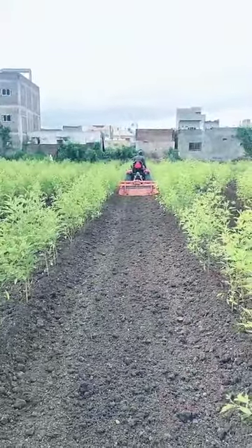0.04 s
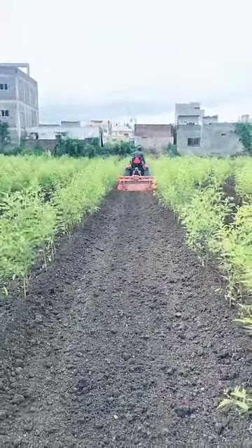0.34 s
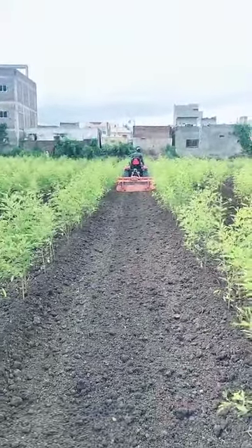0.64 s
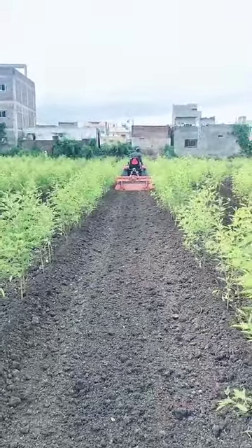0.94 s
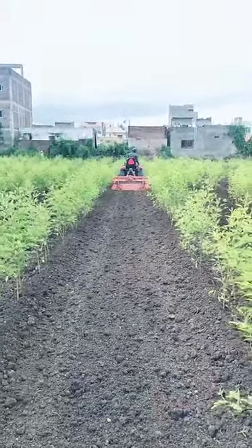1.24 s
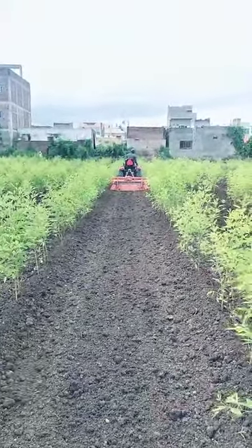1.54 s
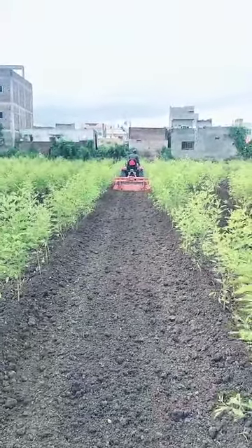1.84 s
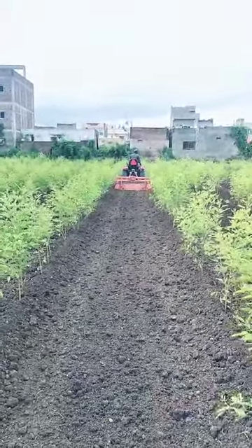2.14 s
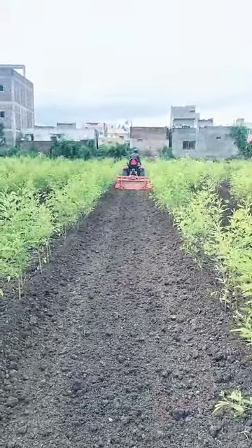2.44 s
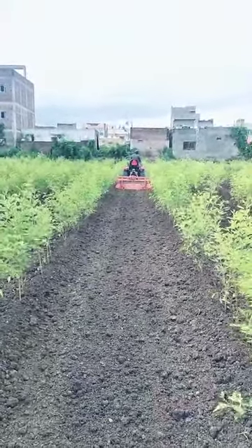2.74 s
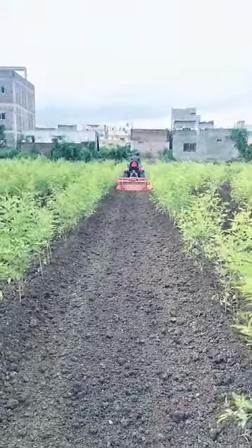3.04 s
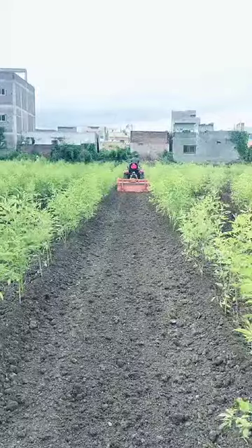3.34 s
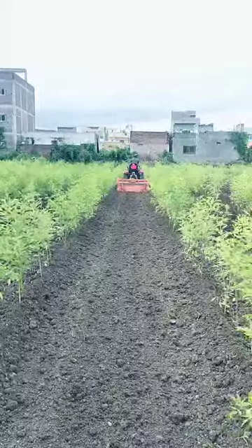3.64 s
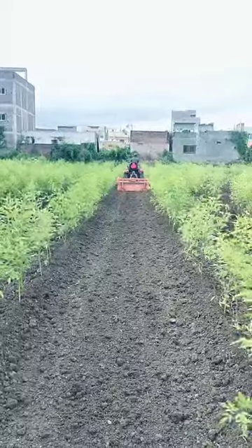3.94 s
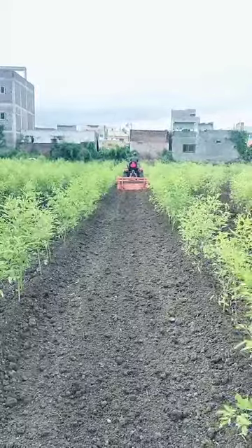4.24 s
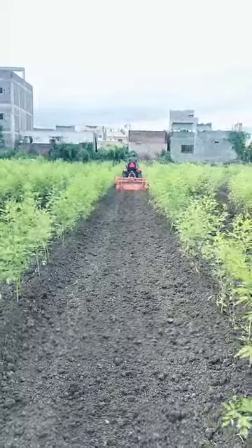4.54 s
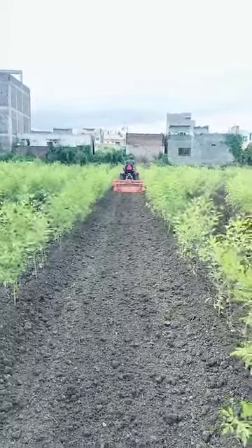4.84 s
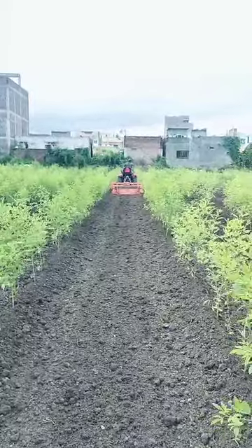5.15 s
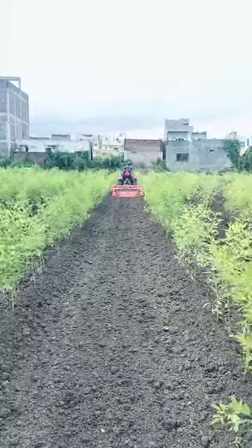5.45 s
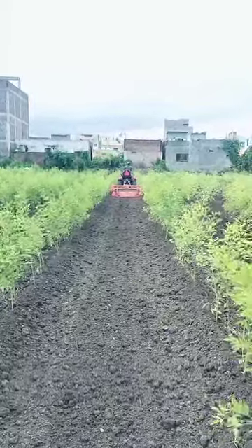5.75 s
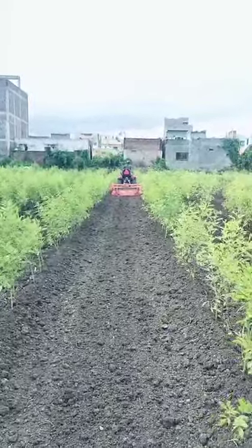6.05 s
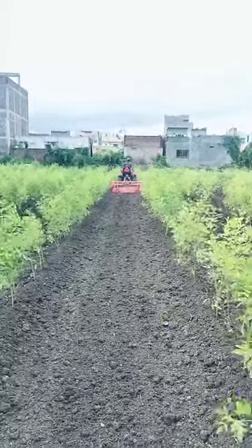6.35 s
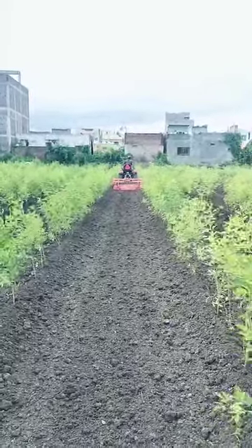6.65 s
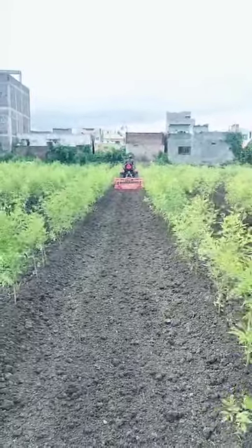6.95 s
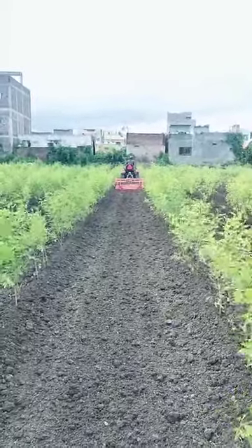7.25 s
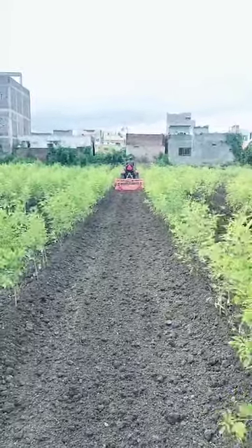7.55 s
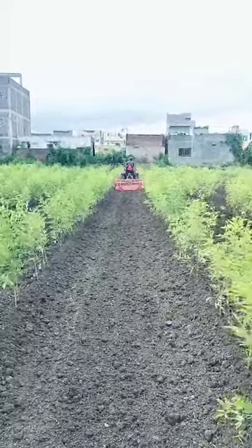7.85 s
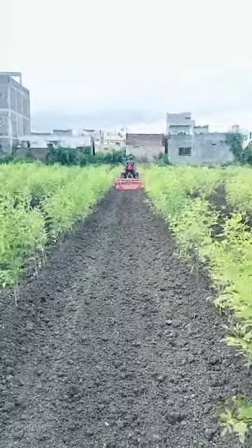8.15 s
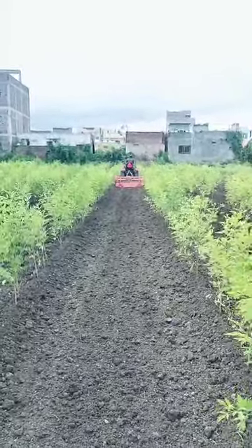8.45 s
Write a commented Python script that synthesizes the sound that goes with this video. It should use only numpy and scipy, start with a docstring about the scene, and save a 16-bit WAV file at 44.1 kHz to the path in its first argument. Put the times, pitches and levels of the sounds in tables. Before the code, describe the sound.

A small diesel tractor is running from the start in an open field, with a steady low throb, a knocking rattle and a wavering gear whine. Its rotary tiller adds a continuous gritty hiss of sprayed soil and faint, high metallic squeals. A loose flap clanks irregularly, most busily in the first two seconds, and stones flick against the hood at about 1.1, 1.5 and 4.3 seconds. The machine slowly gets fainter as it moves away. From around 3.6 seconds wind hits the microphone, with low thumps near 4, 4.6 and 6 seconds and a gusty rumble that continues to the end. The engine sags slightly near 7 seconds, and its throb dips in and out until about 8 seconds, then returns under the wind until roughly 8.6 seconds.

```python
"""First comes the throb of a small diesel tractor, dragging a rotary tiller slowly away over a field.
Exhaust puffs ring the silencer, knocks and taps rattle the block, and gear teeth whine.
The tines spray soil and flick stones at the hood, rub with a faint squeal and keep a flap clanking.
Halfway through, wind starts to buffet the two microphone ports and the throb comes and goes."""
import sys
import numpy as np
from scipy import signal
from scipy.fft import rfft, irfft
from scipy.io import wavfile
from scipy.ndimage import uniform_filter1d

SR = 44100
rng = np.random.default_rng(int(sys.argv[2]) if len(sys.argv) > 2 else 0)


def put_to_file(sound):
    """Save the sound as 16-bit audio at rate SR, in the file named by the first command-line argument."""
    columns = np.atleast_2d(sound).T  # one column per channel
    safe = np.clip(columns, -1, 1)
    whole_steps = np.round(safe * 32767)
    wavfile.write(sys.argv[1], SR, whole_steps.astype(np.int16))


N = 378819
TIME, BINS = np.arange(N) / SR, np.fft.rfftfreq(N, 1 / SR)
CRUISE_SPEED = 34.5  # crankshaft turns a second


def from_db(db):
    """Decibels to gain."""
    return 10 ** (np.asarray(db) / 20)


def unit(x):
    """Scales to an rms of one."""
    return x / np.sqrt(np.mean(x ** 2) + 1e-20)


def stereo(left, right):
    """A value for each channel, as a column."""
    return np.array([[left], [right]])


def over_time(rows):
    """Each column of an automation table, at every sample."""
    times, *columns = np.transpose(rows)
    return np.array([np.interp(TIME, times, c) for c in columns])


def over_hz(rows):
    """Each column of a spectrum table, at every frequency bin."""
    hz, *columns = np.transpose(rows)
    return np.array([np.interp(np.log(BINS + 1), np.log(hz + 1), c) for c in columns])


def colour(x, gain):
    """Filters by a gain for each bin."""
    return irfft(rfft(x) * gain, N)


def ring(hz, width_hz):
    """Gain of a resonance."""
    return 1 / (1 + ((BINS - hz) / (width_hz / np.sqrt(2))) ** 2)


def below(hz, order):
    """Gain of a low-pass."""
    return 1 / (1 + (BINS / hz) ** order)


def noise():
    """Two unrelated channels of white noise."""
    return rng.standard_normal((2, N))


def drift(rate_hz):
    """Smooth random modulation with an rms of one."""
    return unit(colour(rng.standard_normal(N), below(rate_hz, 4)))


def swell(at, length):
    """A smooth rise and fall around one moment."""
    return np.exp(-((TIME - at) / length) ** 2)


def swells_db(rest_db, rows):
    """A resting level with swells on top, in dB; one curve for each level column of the rows."""
    power = sum(from_db(dbs)[:, None] ** 2 * swell(at, length) for at, length, *dbs in rows)
    return 10 * np.log10(from_db(rest_db) ** 2 + power)


def pulses(turns):
    """One click each time the count of turns passes a whole number."""
    return np.diff(np.floor(turns), prepend=np.floor(turns[0]))


def receding_db(fade, speed):
    """Level of a part of the machine: fainter with time, louder with engine speed."""
    start_db, loss_db_per_s, speed_db = fade
    return start_db - loss_db_per_s * TIME + speed_db * (speed - CRUISE_SPEED)


# likeness of the two ports: f/Hz, coherence/0-1
PORT_LIKENESS = [(300, 0.66), (700, 1), (1200, 0.9), (1900, 0.66), (3000, 0.53), (5000, 0.42), (8000, 0.38),
                 (13000, 0.1)]
# lead of the left port: f/Hz, phase/rad
LEFT_LEAD = [(150, 0), (430, .3), (690, -.3), (950, 1.1), (1210, -.2), (1550, .7), (1810, .5), (3100, 1.8),
             (3960, 1.4), (5340, 2.2), (8700, 2.7), (10900, 4), (15200, 6.8)]


def ports(pair):
    """Two unrelated signals become one wide, partly shared sound, mostly leading on the left."""
    same = np.clip(over_hz(PORT_LIKENESS)[0], 0, 1)
    left, other = rfft(pair)
    right = (same * left + np.sqrt(1 - same ** 2) * other) * np.exp(-1j * over_hz(LEFT_LEAD)[0])
    return irfft(np.array([left, right]), N)


# tone of the silencer and its pipe: f/Hz, level/dB
SILENCER_EQ = [(12, -53), (34, -7.5), (69, -2.5), (103, 4), (138, -5.5), (172, -13.5), (206, -19),
               (241, -32.5), (276, -40.5), (330, -35), (450, -34.5), (900, -93)]
# tone of the rushing gas: f/Hz, level/dB
GAS_EQ = [(30, -18), (80, -1.5), (150, 4), (190, -9), (260, -15), (350, -23), (800, -69)]
# single partials bloom or hollow out as the tractor moves: t/s, length/s, f/cruise speed, gain/dB
PARTIAL_SWELLS = [(1.3, 0.61, 2, -1.5), (1.35, 0.45, 3, -1.5), (1.43, 0.59, 4, 4), (2.64, 0.73, 2, -4),
                  (3.3, 0.57, 4, 4), (7.6, 0.5, 4, 6), (7.24, 0.39, 2, 6), (7.5, 0.38, 5, 4.5)]
# fade of the throb: start level/dB, loss/(dB/s), lift/(dB per extra turn a second)
THROB_FADE = (-20, 0.46, 2.14)
# the throb swells or ducks in the wind: t/s, length/s, left gain/dB, right gain/dB
THROB_SWINGS = [(3.7, 0.41, -1.5, -1.5), (4.118, 0.068, 0, -10.5), (4.42, 0.26, 2.5, 4),
                (4.784, 0.087, -5.5, -7), (5.093, 0.14, 2.5, 2.5), (5.8, .3, 1.7, 0),
                (6.154, .06, -1.5, -1.5), (6.567, 0.062, -4, 5), (6.88, 0.18, -5.5, -8),
                (7.178, 0.053, -11, -9), (7.394, 0.1, -10, -5), (7.668, 0.18, -11, -2.5),
                (7.913, .04, -15, -9), (8.3, 0.095, -1, -1.5)]


def exhaust(turns, speed, limp=0.094, uneven=0.0073, rush_db=-17, flutter_db=2.5):
    """One puff a turn, alternately strong and weak, rings the silencer; gas rushes out behind it."""
    puffs = pulses(turns) * (1 + limp * np.cos(np.pi * turns) + uneven * rng.standard_normal(N))
    cepstrum = irfft(np.log(from_db(over_hz(SILENCER_EQ)[0])), N)
    silencer = np.exp(rfft(cepstrum * (1 + np.sign(np.fft.fftfreq(N)))))  # rings only after the puff
    rush = unit(colour(rng.standard_normal(N), from_db(over_hz(GAS_EQ)[0])))
    throb = unit(colour(puffs, silencer)) + from_db(rush_db) * rush
    throb += sum((from_db(db) - 1) * swell(at, length) * colour(throb, ring(k * CRUISE_SPEED, 16))
                 for at, length, k, db in PARTIAL_SWELLS)
    swings_db = sum(stereo(left, right) * swell(at, length) for at, length, left, right in THROB_SWINGS)
    level_db = receding_db(THROB_FADE, speed) + swings_db + stereo(0, 0.9)
    faded = np.clip((level_db.max() - level_db.mean(0)) / 10, 0, 1) ** 2  # more flutter when faint
    return from_db(level_db + flutter_db * faded * drift(13)) * throb


# the four piston knocks of one engine cycle: relative strength
KNOCK_ACCENTS = [.9, .2, .3, 1.1]
# ring of the block and sheet metal: f/Hz, left level/dB, right level/dB
BLOCK_EQ = [(147, 1, 7.5), (292, -10, -8.5), (531, -4, -7), (694, 3, 5), (765, -4, -0.5), (897, -10, 3),
            (1050, 2, -16.5), (1167, -2.5, -4.5), (1375, -13, -3), (1420, -3.5, -0.5), (1780, -3.5, -6),
            (1850, -27, -16), (2205, -10, -8.5), (5070, -45.5, -41)]
# fades of block and panels: start level/dB, loss/(dB/s), lift/(dB per extra turn a second)
DRONE_FADE = (-36.5, 0.3, 1.44)
RATTLE_FADE = (-39, 0.19, .1)


def clatter(turns, speed, tap_share=0.14, knock_turns=0.063, tap_count=26):
    """Valves and injectors tap at set angles of the two-turn cycle; pistons knock every half turn."""
    angles, sizes = rng.random((tap_count, 2)).T
    taps = sum(size * pulses(turns / 2 + angle) for angle, size in zip(angles, sizes))
    half_turn, since = np.divmod(turns + .16, .5)
    accent = np.take(KNOCK_ACCENTS, half_turn.astype(int), mode="wrap")
    knocks = noise() * (1 + accent * np.exp(-since / knock_turns))
    blows = np.sqrt(tap_share) * unit(taps - taps.mean()) + np.sqrt(1 - tap_share) * unit(knocks)
    body = colour(ports(blows), from_db(over_hz(BLOCK_EQ)))
    drone = colour(body, below(960, 16))  # the heavy block rings low, the thin panels above it
    drone_db = receding_db(DRONE_FADE, speed) + 0.81 * drift(5.3)
    rattle_db = receding_db(RATTLE_FADE, speed) + 0.75 * drift(29)
    return from_db(drone_db) * unit(drone) + from_db(rattle_db) * unit(body - drone)


# pitches of the low, middle and high gear mesh: f/crankshaft speed
MESH_PITCHES = [11.5, 21, 33]
# fade of the low mesh: start level/dB, loss/(dB/s), lift/(dB per extra turn a second)
LOW_MESH_FADE = (-41, 0.59, 9.6)
# the upper meshes sing out, before panning: t/s, length/s, middle level/dB, high level/dB
MESH_SURGES = [(.8, 0.36, -47, -53.5), (1.78, 0.17, -47.5, -68), (2.798, 0.19, -44, -57),
               (4.38, 0.36, -45, -53), (4.83, 0.073, -48, -57), (5.383, .12, -45.5, -53),
               (5.87, 0.065, -43, -64), (6.398, 0.31, -63, -48), (7.047, 0.15, -63.5, -51.5),
               (7.45, 0.15, -52, -52)]
# pitches of the faint drive-train tones: f/crankshaft speed
DRIVE_PITCHES = [12, 19, 23, 25.5, 43]
# the same tones: start level/dB
DRIVE_LEVELS = [-54, -54.5, -53.5, -60, -55.5]


def gears(turns, speed, waver_db=3.0, fade_db_per_s=0.7):
    """Gear teeth sing at multiples of the shaft speed; play in the teeth makes the tones waver."""
    def tone(order, db, play_rad, rate_hz=9.3):
        """One mesh, as a rotating phasor."""
        return from_db(db) * np.exp(1j * (2 * np.pi * order * turns + play_rad * drift(rate_hz)))
    middle_db, high_db = swells_db(rest_db=[[-54], [-58]], rows=MESH_SURGES)
    low = tone(MESH_PITCHES[0], receding_db(LOW_MESH_FADE, speed) + drift(7.5), play_rad=0.05)
    middle = tone(MESH_PITCHES[1], middle_db + 2.9 * drift(3.9), play_rad=0.52)
    high = tone(MESH_PITCHES[2], high_db + 4.9 * drift(12), play_rad=.9, rate_hz=22)
    drive = sum(tone(order, db - fade_db_per_s * TIME + waver_db * drift(1.94), play_rad=1)
                for order, db in zip(DRIVE_PITCHES, DRIVE_LEVELS))
    left = low * from_db(-0.5) + middle + high * from_db(4.5) + drive
    right = low * np.exp(-.7j) * from_db(-3.5) + middle + high * from_db(-6.5) + drive
    return np.sqrt(2) * np.array([left.real, right.real])


# how hard the tines work the earth: t/s, relative level/dB
TINE_BITE = [(0, -45), (2.3, -45), (2.85, -44), (3.1, -46.5), (3.7, -46.5), (4.2, -44), (5, -45),
             (6.9, -45), (8.59, -49.5)]
# tone of earth spraying the hood: f/Hz, left level/dB, right level/dB
SPRAY_EQ = [(400, 0.5, -6.5), (2010, 5.5, 6), (3000, 3, 4.5), (3430, 0.5, 0.5), (3720, -0.5, -3),
            (4200, 1, 0), (5180, -1.5, 3), (5160, -7.5, -2), (6380, -6.5, -9), (7310, -18.5, -18),
            (8000, -27, -25), (11100, -27, -19.5), (12300, -50, -15.5), (15500, -38, -50)]
# modes of the hood: f/Hz, width/Hz, left boost/dB, right boost/dB
HOOD_MODES = [(2140, 120, -1.5, 4.5), (2360, 54, -2, 6.5), (2847, 73, -9, 6), (3660, 90, 7.5, 3.5),
              (3900, 70, 1.5, 6.5)]


def soil(turns, crumbs_per_s=2500, crumb_spread_db=2.0, crumb_mix=0.76, pulse_depth=0.025):
    """Crumbs patter on the ringing hood over a hiss of sifting earth that pulses with the drive."""
    hits = rng.random(N) < crumbs_per_s / SR
    crumbs = hits * from_db(crumb_spread_db * np.minimum(rng.exponential(1, N), 4))
    spray = noise() + crumb_mix * unit(crumbs * noise())
    spray *= 1 + pulse_depth * np.cos(4 * np.pi * (turns + 0.1))
    spray *= from_db(.5 * drift(31))
    hood_db = sum(stereo(left, right) * ring(hz, width) for hz, width, left, right in HOOD_MODES)
    patter = unit(colour(ports(spray), from_db(over_hz(SPRAY_EQ) + hood_db)))
    return from_db(over_time(TINE_BITE)[0] + 5.0) * patter


# accented clanks of the trailing flap: t/s, relative level/dB
FLAP_CLANKS = [(.04, -31.5), (.16, -30.5), (.29, -36), (0.449, -35), (.585, -34), (.82, -28.5), (.97, -34),
               (1.105, -38), (1.505, -32), (1.622, -29), (1.758, -33), (1.905, -35), (2.424, -34),
               (2.70, -46), (2.97, -38), (3.35, -32), (4.12, -38), (4.175, -35), (4.267, -46), (5.27, -44),
               (5.476, -38), (6.945, -32), (7.075, -36), (7.738, -34), (7.89, -36.5)]
# modes of the flap: f/Hz, width/Hz, level/dB
FLAP_MODES = [(1150, 330, -5), (1510, 120, 2), (1620, 44, -0.5), (2130, 200, -8), (2950, 200, -6.5)]


def flap(turns, slaps_a_turn=0.2, slap_db=-42, spread_db=4.5, attack_s=0.00076, decay_s=0.019):
    """The spinning rotor keeps the flap slapping; each slap is a short chatter that rings its modes."""
    slaps = pulses(slaps_a_turn * turns + 0.066 * drift(3)) ** 2
    slaps *= from_db(slap_db + spread_db * rng.standard_normal(N))
    for at, db in FLAP_CLANKS:
        slaps[round(at * SR)] += from_db(db)
    t = TIME[:SR // 4]
    slap_shape = np.exp(-t / decay_s) * (1 - np.exp(-t / attack_s))
    envelope = signal.oaconvolve(slaps, slap_shape)[:N]
    modes = sum(from_db(db) * ring(hz, width) for hz, width, db in FLAP_MODES)
    return from_db(-1.0) * envelope * unit(colour(ports(noise()), modes))


# high modes of the rubbing steel: f/Hz, width/Hz, left level/dB, right level/dB
STEEL_MODES = [(6030, 40, 4, 3), (8440, 25, -15.5, -15), (13474, 30, -5, 11.5), (14028, 16, -3.5, -7)]
# fits of squealing: t/s, length/s, relative level/dB
SQUEAL_CUES = [(0.46, 0.12, -67), (0.612, 0.024, -59), (0.79, .03, -59), (1.05, 0.091, -68),
               (1.35, 0.12, -70), (1.586, 0.019, -62), (1.87, 0.023, -60), (2.1, .05, -71),
               (2.43, 0.066, -63), (2.9, .03, -75), (3.5, .025, -68.5), (3.76, .05, -73), (4.22, .05, -68),
               (4.55, 0.13, -72), (4.918, 0.069, -62), (5.15, .03, -70), (6.29, .035, -66), (6.8, .03, -69),
               (7.18, .03, -73), (7.9, 0.13, -70), (8.25, 0.068, -73)]
# the lowest steel mode chirps on its own: t/s, length/s, relative level/dB
CHIRP_CUES = [(0.552, 0.14, -51), (.79, .025, -45), (1.867, 0.021, -49), (2.36, 0.11, -46),
              (6.464, .04, -49), (6.92, 0.036, -49), (7.76, 0.069, -54), (8.166, .03, -51),
              (8.266, 0.027, -51)]


def squeal(fits_db=3.5):
    """Rubbing tines set high steel modes singing in fits over a faint steady ring."""
    modes = sum(from_db(stereo(left, right)) * unit(colour(noise(), ring(hz, width)))
                for hz, width, left, right in STEEL_MODES)
    chirp = from_db(stereo(-4, 4)) * unit(colour(noise(), ring(hz=5060, width_hz=130)))
    grip_db = fits_db * drift(21) - 2.5
    squeal_db = swells_db(rest_db=-79, rows=SQUEAL_CUES) + grip_db
    chirp_db = swells_db(rest_db=-65, rows=CHIRP_CUES) + .5 * grip_db
    return ports(modes * from_db(squeal_db) + chirp * from_db(chirp_db))


# bed of breeze between gusts: t/s, level/dB
BREEZE_BED = [(0, -50), (3.2, -48), (4.0, -29), (5.7, -38.5), (6.3, -26.5), (7.5, -29), (8.0, -30.5),
              (8.59, -32)]
# gusts at the ports: t/s, length/s, left level/dB, right level/dB
GUST_CUES = [(0.496, 0.33, -34, -44), (2.15, .12, -37, -34), (3.635, .08, -50, -23), (4.59, 0.06, -33, -20),
             (4.93, 0.07, -27, -28), (5.15, 0.097, -38, -24.5), (5.353, 0.054, -28.5, -27),
             (5.893, 0.068, -30, -28), (7.015, 0.068, -22, -21.5), (7.317, .12, -28, -25),
             (7.82, 0.1, -28, -30), (8.45, 0.13, -30, -31)]
# tone of the wind rumble: f/Hz, level/dB
RUMBLE_EQ = [(8, -23), (25, 7), (60, 2.5), (110, 4), (150, 0), (200, -17.5), (300, -40.5), (600, -28),
             (2000, -80)]


def wind(lump_db=2.5):
    """Moving air gives each port its own lumpy rumble, faint at first and swelling in gusts."""
    strength_db = swells_db(over_time(BREEZE_BED), GUST_CUES) + lump_db * drift(12.5)
    return from_db(strength_db) * unit(colour(noise(), from_db(over_hz(RUMBLE_EQ))))


# stones and clods hit the hood: t/s, level/dB, f/Hz, width/Hz, length/s
STONE_HITS = [(1.129, -43, 4000, 2000, 0.016), (1.484, -38, 3950, 2400, 0.01), (2.44, -52, 6100, 89, 0.045),
              (4.12, -55, 6300, 1500, .015), (4.336, -40, 4000, 2200, 0.02), (4.738, -48, 5800, 2000, .012),
              (6.278, -56.5, 6960, 250, .014), (6.37, -64, 9900, 250, 0.011), (7.583, -61, 9900, 200, .014)]


def stones():
    """Thrown stones and clods draw short scrapes and pings from the hood."""
    return sum(from_db(db) * swell(at, length) * unit(colour(noise(), ring(hz, width) ** 2))
               for at, db, hz, width, length in STONE_HITS)


# single thumps of wind: t/s, relative level/dB, length/s, pan/0-1 (left to right)
BUFFET_HITS = [(4.006, -23.5, 0.022, .99), (4.088, -23.5, 0.027, 1), (4.276, -30, 0.024, 0.85),
               (4.423, -36, 0.036, 0.9), (4.568, -32.5, 0.051, 0.85), (4.628, -21.5, 0.01, 0),
               (4.956, -31, 0.032, 1), (5.1, -29.5, 0.021, 1), (5.243, -37, 0.018, .9),
               (5.911, -25, 0.037, 0.98), (7.1, -37, 0.029, 0.3), (7.33, -37, 0.018, 0.1),
               (7.592, -27.5, 0.021, 0.46), (7.896, -33, 0.036, 0.3)]
# tone of a thump: f/Hz, level/dB
BUFFET_EQ = [(15, -21), (60, 9.5), (150, 5), (250, 1), (350, -12), (500, -25), (900, -44), (3000, -80)]


def buffets():
    """Sharp pushes of air thump the ports, reaching higher in pitch than the rumble."""
    push = np.zeros((2, N))
    for at, db, length, pan in BUFFET_HITS:
        envelope = np.exp(-((TIME - at) / length) ** 2 / 2)
        push += from_db(db) * np.sqrt(stereo(1 - pan, pan)) * envelope
    return from_db(5.0) * push * unit(colour(noise(), from_db(over_hz(BUFFET_EQ))))


def open_air(x, patchy_db=0.5):
    """Moving air lets narrow patches of a distant sound swell and fade."""
    spectra = signal.stft(x, nperseg=1024, noverlap=768)[2]
    patches = uniform_filter1d(rng.standard_normal(spectra.shape[1:]), size=4, axis=0)  # across pitch
    patches = uniform_filter1d(patches, size=20, axis=1)  # across time
    spectra *= from_db(patchy_db * unit(patches) + 0.18)
    return signal.istft(spectra, nperseg=1024, noverlap=768)[1][:, :N]


# the crankshaft sags when the tines bite: t/s, speed/(turns/s)
CRANK_SPEED = [(0, 34.76), (0.75, 34.27), (1.25, 34.33), (1.7, 34.73), (2.7, 34.43), (3.35, 34.42),
               (4.0, 34.11), (4.6, 34.02), (5.2, 33.7), (5.65, 34.3), (6.2, 33.49), (6.93, 33.1),
               (8.0, 34.58), (8.59, 34.46)]


def scene():
    """The crankshaft drives engine and tiller alike; the wind plays over both."""
    speed = over_time(CRANK_SPEED)[0]
    turns = .58 + np.cumsum(speed) / SR
    throb = exhaust(turns, speed)
    engine = clatter(turns, speed)
    whine = gears(turns, speed)
    tiller = soil(turns) + flap(turns) + stones()
    return throb + whine + open_air(engine + tiller) + squeal() + wind() + buffets()


# low shelves thin the right side, then the deepest rumble: t/s, f/Hz, left gain/dB, right gain/dB
BASS_SHELVES = [(6.02, 430, 1, -4), (6.2, 53, -6, -4)]


def record(dry, ramp_s=0.076, top_hz=15700):
    """The bass thins towards the end; a steep high cut trims the top throughout."""
    for at, hz, left, right in BASS_SHELVES:
        shelf_db = stereo(left, right) * np.clip((TIME - at) / ramp_s + .5, 0, 1)
        dry = dry + (from_db(shelf_db) - 1) * colour(dry, below(hz, 8))
    return colour(dry, np.clip((top_hz - BINS) / 100 + .5, 0, 1))


dry = scene()
out = record(dry)
put_to_file(out)
```